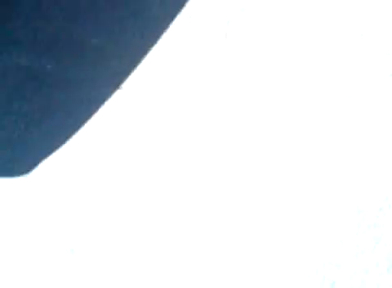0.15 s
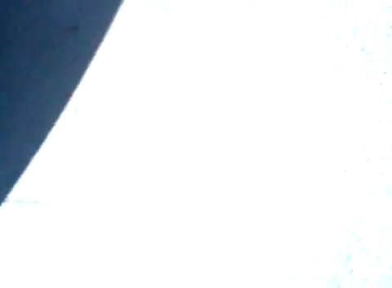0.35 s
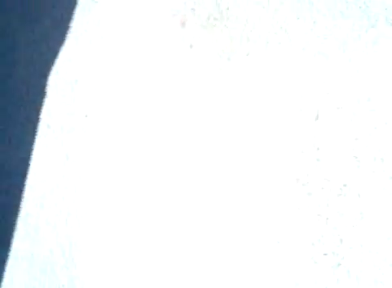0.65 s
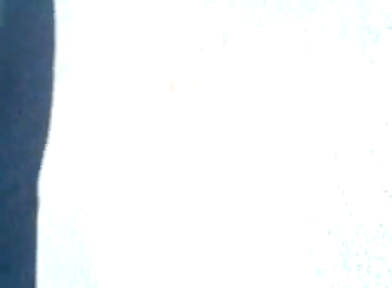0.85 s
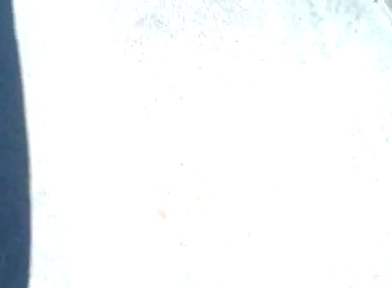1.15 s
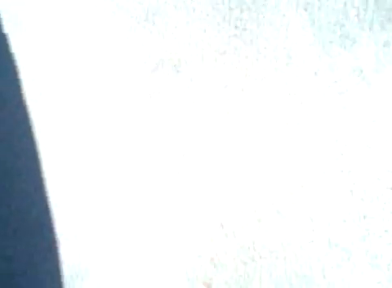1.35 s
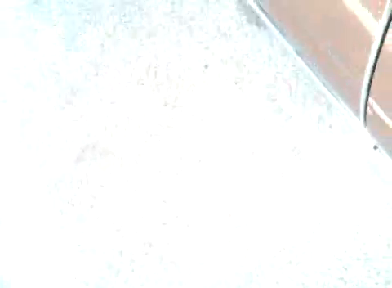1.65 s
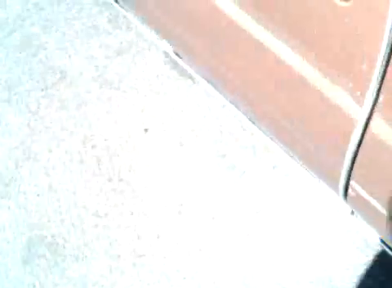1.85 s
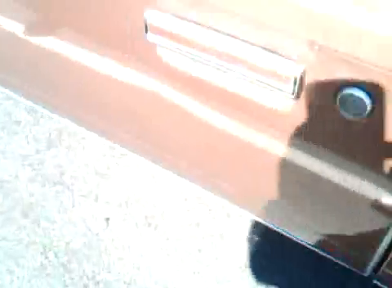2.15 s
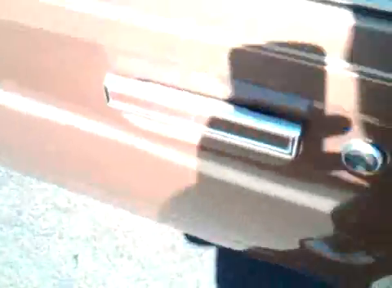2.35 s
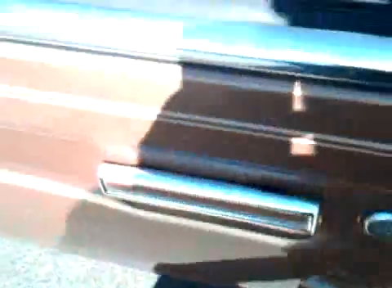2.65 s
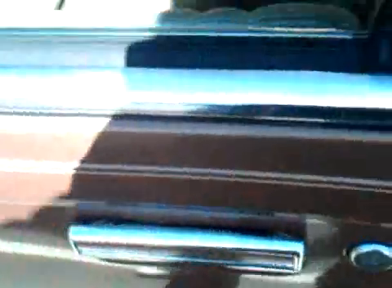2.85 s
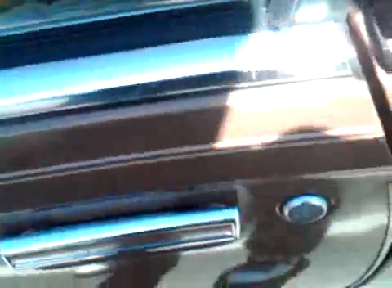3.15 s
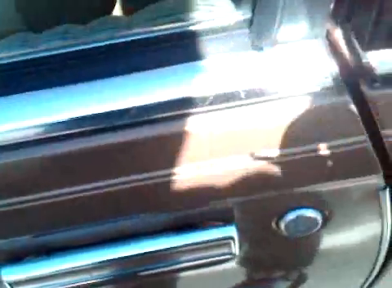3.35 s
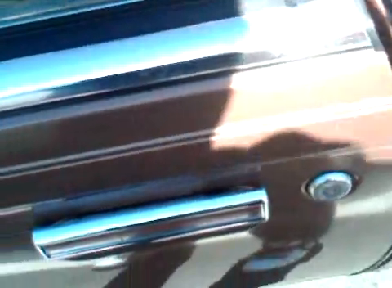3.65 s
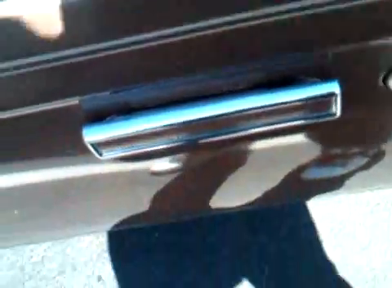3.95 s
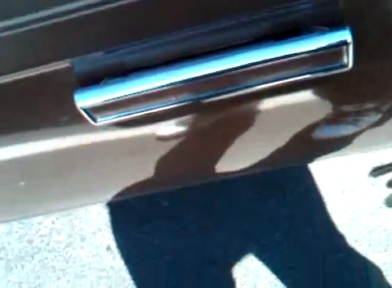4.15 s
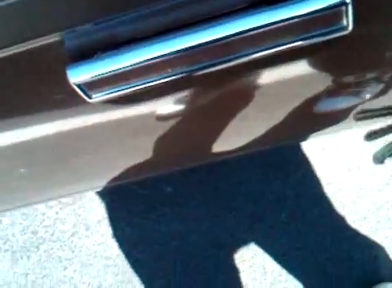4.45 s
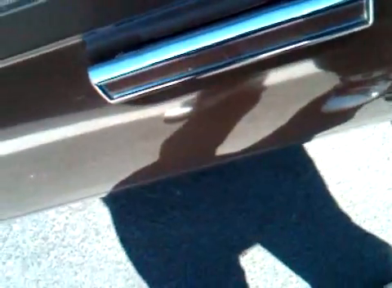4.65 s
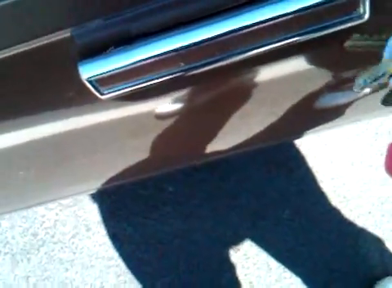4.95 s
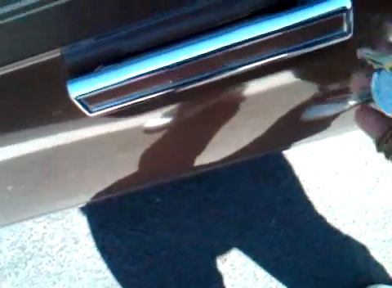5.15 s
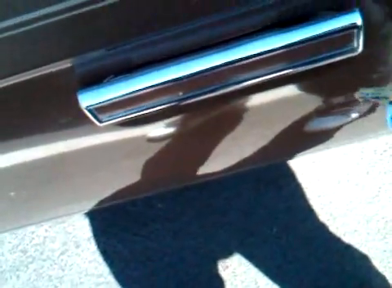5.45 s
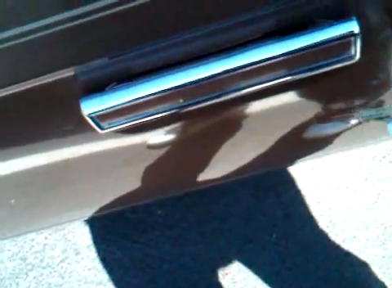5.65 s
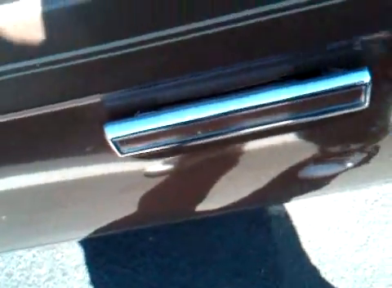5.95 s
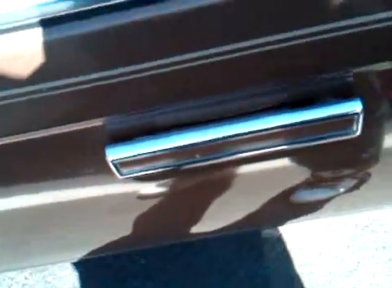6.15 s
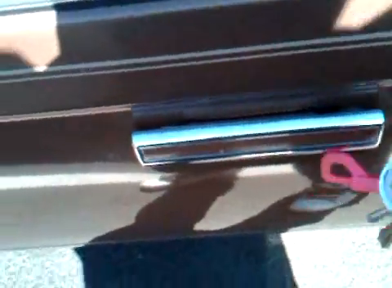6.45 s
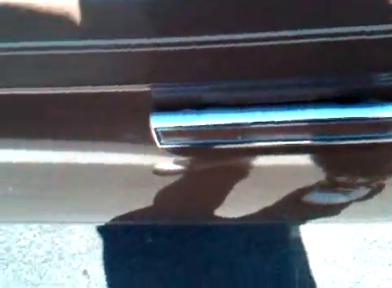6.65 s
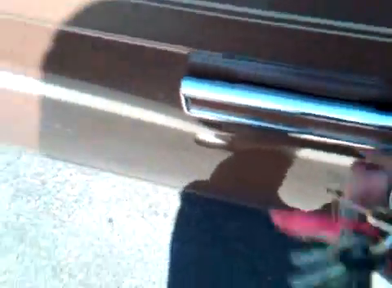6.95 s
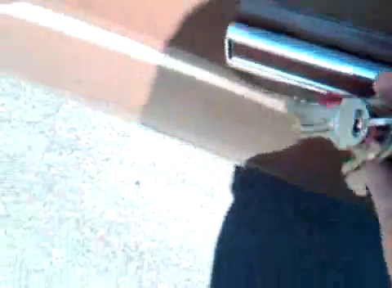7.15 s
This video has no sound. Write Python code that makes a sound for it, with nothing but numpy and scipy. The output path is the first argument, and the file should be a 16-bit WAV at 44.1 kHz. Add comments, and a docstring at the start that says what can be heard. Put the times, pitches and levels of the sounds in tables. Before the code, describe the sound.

Outdoors by a parked car, keys are handled close to the microphone over faint distant traffic: a low wavering drone near 200 Hz, soft rumble and tyre hiss. From 0 to 1 s come light, separate clinks; from 1 to 2.4 s the bunch jangles densely, with bright cracks around 1.3, 1.8 and 1.9 s. After a short thinning, a sharp clink at 2.9 s leads to a lively cluster at 3.2-3.5 s, then scattered clinks until 4.15 s. It is almost quiet from 4.2 to 5.2 s, with small lock taps near 4.3 and 5.0. A hard metallic clack with a brief rattle hits at 5.4 s; double clicks follow at 5.7 s, clinks around 6 s, a dull tap at 6.3 s. Jangling surges from 6.6 s, ending with the loudest clash and a knock at 7.25 s. Rings are short, dry and high, with treble cut off above about 7 kHz.

```python
"""A bunch of keys jangles in a hand, close to the microphone: cracks and short rings over a wash of contacts.
Beside it, a key is pushed into a parked car's door lock, turned and pulled out: blows excite resonances.
Further off, street traffic drones, growls, rumbles and hisses as bands of noise with drifting levels.
A steep band limit near 7.4 kHz, a faint image of the top band mirrored about 8 kHz and a trace of hiss end it."""
import sys
import numpy as np
from scipy import signal
from scipy.fft import rfft, irfft, next_fast_len
from scipy.io import wavfile
from scipy.ndimage import map_coordinates

SR = 44100
rng = np.random.default_rng(int(sys.argv[2]) if len(sys.argv) > 2 else 0)


def wrap_up_sound(samples):
    """Save the sound to the file named by the first command line argument, as 16-bit audio."""
    columns = np.atleast_2d(samples).T
    # keep every value between -1 and 1, then stretch to whole-number steps
    tamed = np.clip(columns, -1, 1)
    steps = np.round(tamed * 32767).astype(np.int16)
    wavfile.write(sys.argv[1], SR, steps)


N = 322371

# ringing modes of the freely hung keys: (frequency [Hz], relative level [dB], t60 when free [s])
KEY_MODES = [(2134, -3, .06), (2290, -5, .08), (2390, -2, .08), (2656, 0, .08), (3294, -2, .09),
             (3750, 1, .06), (4280, -8, .07), (4605, -5, .12), (4849, -7, .1), (4962, -5, .12),
             (5120, -6, .08), (5340, -3, .08), (5700, -5, .07), (5927, -3, .12), (6069, 0, .14),
             (6340, -3, .08), (6527, 0, .13), (6770, -2, .09), (6914, 1.5, .24), (7085, -2, .09),
             (7195, -2, .11)]
HEAVY_BELOW_HZ = 4000  # modes below belong to the heavier parts of the bunch


def amp(db):
    """Amplitude factor of a level in dB."""
    return 10 ** (np.asarray(db) / 20)


def unit(x):
    """x scaled to rms 1."""
    return x / np.sqrt(np.mean(x ** 2) + 1e-20)


def along(points, hz):
    """Values at hz, read between (Hz, value) points on a log frequency axis."""
    f, v = np.transpose(points)
    return np.interp(np.log(hz + 1), np.log(f + 1), v)


def curves(rows):
    """One value per sample for each column after the time."""
    s, *cols = np.transpose(rows)
    return [np.interp(np.arange(N) / SR, s, c) for c in cols]


def wobble(rate):
    """A smooth random curve with rate knots a second."""
    knots = rng.standard_normal(int(N * rate / SR) + 4)
    return map_coordinates(knots, [np.arange(N) * rate / SR])


def filtered(x, response):
    """x filtered by a complex response of frequency."""
    m = next_fast_len(N + SR // 2)
    return irfft(rfft(x, m) * response(np.fft.rfftfreq(m, 1 / SR)), m)[..., :N]


def colored(x, spectrum):
    """x filtered to the colour given by (Hz, dB) points, at rms 1."""
    return unit(filtered(x, lambda hz: amp(along(spectrum, hz))))


def noise(spectrum):
    """Steady noise of the given colour, at rms 1."""
    return colored(rng.standard_normal(N), spectrum)


def resonances(modes):
    """Causal response of (Hz, width Hz, dB) resonances added with alternating sign."""
    def response(f):
        total = 0
        for k, (c, w, db) in enumerate(modes):
            total = total + (-1) ** k * amp(db) * 1j * f * w / (c * c - f * f + 1j * f * w)
        return total
    return response


def street():
    """Distant traffic: a drifting band of engine drone over rumble, growl and tyre hiss."""
    # traffic before the small level wobbles: (time [s], drone pitch [Hz], drone level [dB],
    # engine growl level [dB], rumble level [dB], tyre hiss level [dB])
    traffic = [(0, 192.9, -48.5, -65.5, -57.5, -65.5), (0.5, 193.2, -49.5, -68, -59.5, -66.5),
               (1.25, 191.6, -55.5, -58.5, -56.5, -66.5), (1.75, 198.3, -52, -59.5, -61.5, -65.5),
               (2.1, 200, -59.5, -75, -58, -67.0), (2.7, 208.6, -56, -69, -58.5, -64.5),
               (3.3, 214.9, -51, -71, -61, -64), (3.7, 225.2, -51.5, -73, -68, -68.5),
               (4.2, 227.5, -47.5, -67.5, -59, -66.5), (4.45, 222.1, -51.5, -71, -58, -66.5),
               (4.7, 217.4, -52, -74, -58, -67), (5.35, 211.2, -61, -69, -60.5, -66),
               (6.0, 235.8, -56, -78, -62, -66.5), (6.6, 232.7, -55.5, -69, -55, -66),
               (7.31, 212.5, -61.5, -74.5, -62.5, -68.5)]
    # colour of the rumble: (frequency [Hz], relative density [dB])
    rumble_color = [(12, -36), (20, -9.5), (59, 5), (140, -5), (180, -26), (310, -120)]
    # colour of the tyre hiss: (frequency [Hz], relative density [dB])
    hiss_color = [(260, -38), (450, 1), (575, 1.5), (796, 7), (973, 6), (2910, -18), (4250, -23),
                  (5080, -33), (6500, -38), (8450, -44), (14300, -120)]
    growl_color = [(200, -62.0), (300, -9), (390, -3.5), (480, -10), (600, -19), (800, -45)]  # (Hz, dB)

    drone_hz, drone_db, growl_db, rumble_db, hiss_db = curves(traffic)
    # slow noise carried on the drifting pitch makes a band that follows it
    slow = filtered(rng.standard_normal((2, N)), lambda hz: 1 / (1 + (hz / 62) ** 3))
    turn = 2 * np.pi * np.cumsum(drone_hz) / SR
    drone = unit(slow[0] * np.cos(turn) + slow[1] * np.sin(turn))
    out = amp(drone_db + 1.7 * wobble(8)) * drone
    out += amp(growl_db + 1.7 * wobble(9)) * noise(growl_color)
    out += amp(rumble_db + 2.2 * wobble(4)) * noise(rumble_color)
    out += amp(hiss_db + 1.2 * wobble(7.4)) * noise(hiss_color)
    return out


def shaking():
    """Jingle level and relative scrape level in dB: shakes rise fast, hold and settle; their powers add."""
    # shakes of the bunch: (start [s], length [s], jingle level [dB],
    # scrape of the heavier parts against that [dB])
    shakes = [(0.18, 0.042, -67, -6.5), (0.623, 0.054, -62.5, -5.5), (0.695, 0.064, -56.5, -11.5),
              (0.864, 0.064, -57, -10), (0.98, 0.13, -57, -14), (1.045, 0.11, -52.5, -9),
              (1.142, 0.26, -46.5, -10.5), (1.405, 0.045, -52.5, -25), (1.662, 0.0044, -56.5, -14),
              (1.701, 0.038, -55, -11), (1.81, 0.067, -47, -16), (1.886, 0.086, -44, -12.5),
              (2.019, 0.017, -52, -16), (2.087, 0.039, -58.5, -12), (2.157, 0.0048, -40, -10),
              (2.288, 0.14, -57, -15.5), (2.567, 0.016, -56.5, -0.5), (2.787, 0.027, -56.5, -15),
              (2.892, 0.0097, -44, -17.5), (3.01, 0.0039, -53, -25), (3.068, 0.012, -54.5, -0.5),
              (3.209, 0.045, -47.5, -23), (3.28, 0.1, -46, -8), (3.439, 0.086, -47, -24),
              (3.553, 0.077, -59.5, -24), (3.695, 0.1, -54.5, -15), (3.792, 0.0077, -68.5, -19),
              (3.857, 0.0091, -53.5, -7), (3.937, 0.016, -53, -11.5), (4.04, 0.041, -59.5, -12.5),
              (4.148, 0.01, -56, -27), (4.997, 0.045, -57, -6), (5.265, 0.037, -52.5, -3),
              (5.31, 0.024, -59, 0.5), (5.374, 0.094, -56, -8), (5.695, 0.014, -54, 2),
              (5.809, 0.06, -73.5, 5.5), (5.925, 0.049, -56, -5), (5.974, .11, -56.5, -4.5),
              (6.477, 0.047, -62, -17), (6.547, 0.0088, -50.5, -18), (6.606, 0.032, -54, -15),
              (6.684, 0.035, -53.5, -8), (6.772, 0.048, -43, -4), (6.863, 0.076, -42, -14.5),
              (6.963, 0.065, -55.5, -23), (7.01, 0.035, -53.5, -36), (7.078, 0.057, -42.5, -19),
              (7.171, 0.054, -55, -39), (7.273, 0.079, -61.5, 15.5)]
    rise_db_per_s, settle_db_per_s = 1197, 504  # before a shake starts, after it ends
    rest_db, rest_scrape_db = -83.5, 1  # the bunch barely stirring in the hand

    t = np.arange(0, N / SR + .002, .001)
    s, length, db, scrape_db = np.transpose(shakes)[:, :, None]
    rising_db = rise_db_per_s * np.maximum(s - t, 0)
    settling_db = settle_db_per_s * np.maximum(t - s - length, 0)
    power = amp(db - rising_db - settling_db) ** 2
    light = amp(rest_db) ** 2 + power.sum(0)
    heavy = amp(rest_db + rest_scrape_db) ** 2 + (power * amp(scrape_db) ** 2).sum(0)
    return curves(np.transpose([t, 10 * np.log10(light), 10 * np.log10(heavy / light)]))


def freedom_db(shake_db):
    """Keys ring more freely the harder the bunch is shaken, up to a jingle level where they hang loose."""
    loose_db, freer_db_per_db = -54, 2.34
    return freer_db_per_db * np.minimum(shake_db - loose_db, 0)


def touches(rate, spread_db, life):
    """Tiny contacts, rate a second: noise bursts of scattered size that start sharply and fall 60 dB in life s."""
    sizes = (rng.random(N) < rate / SR) * amp(spread_db * rng.exponential(size=N))
    fade = amp(-60 * np.arange(SR // 10) / SR / life)
    return unit(signal.fftconvolve(sizes, fade)[:N] * rng.standard_normal(N))


def jingle():
    """The shaken bunch: a wash of small contacts, sharper ticks, and keys set ringing by their own chance taps."""
    # colour of the light contacts: (frequency [Hz], relative density [dB])
    wash_color = [(2060, -39), (3500, -30), (4400, -16), (5870, -3), (6410, -6), (7400, -6), (9620, -34.5),
                  (16300, -120)]
    # colour of the heavier parts scraping: (frequency [Hz], relative density [dB])
    scrape_color = [(1000, -52.5), (1700, -17), (1950, -16), (2300, -11), (3920, -8), (4400, -4),
                    (5720, -15), (9680, -120)]
    wash_db, tapped_db = -4, -4.5  # wash and tapped ringing against the jingle level
    taps_per_s, tapped_life = 45, .55  # taps on each mode; share of t60 left among touching neighbours

    jingle_db, scrape_db = shaking()
    light, heavy = amp(jingle_db), amp(jingle_db + scrape_db)
    contacts = touches(450, 2.7, life=.013) + .8 * touches(140, 3.5, life=.004)
    wash = colored(contacts, wash_color)
    scrape = colored(touches(900, 1.5, life=.016), scrape_color)
    ringing = np.zeros(N)
    for hz, db, t60 in KEY_MODES:
        strength = heavy if hz < HEAVY_BELOW_HZ else light
        taps = strength * (rng.random(N) < taps_per_s / SR) * rng.standard_normal(N)
        keep = amp(-60 / (tapped_life * t60 * SR))  # what is left of the swing after one sample
        turn = 2 * np.pi * hz / SR
        ringing += amp(db) * signal.lfilter([np.sin(turn)], [1, -2 * keep * np.cos(turn), keep ** 2], taps)
    out = amp(wash_db) * light * wash
    out += amp(tapped_db + freedom_db(jingle_db)) * ringing
    return out + amp(-3) * heavy * scrape


def clinks():
    """Keys strike keys: a short crack rings the modes nearest its bright region, at new strengths each time."""
    # keys striking keys: (time [s], strike level [dB], brightest region [Hz], heavier parts [dB])
    strikes = [(0.0438, -43.5, 4860, -13), (0.293, -52, 4090, 9.5), (0.3245, -39, 6690, -34),
               (0.463, -35, 6500, -36), (0.622, -41, 6130, -32), (0.7005, -38.5, 6610, -31),
               (0.7915, -43, 6840, -25), (0.87, -46, 6100, -25), (0.9518, -37.5, 5240, -33),
               (1.026, -42.5, 6930, -14), (1.0595, -33, 5260, -30), (1.1574, -41.5, 6900, -12),
               (1.19, -32.5, 5660, -39), (1.2152, -32.5, 5830, -20.5), (1.262, -26.5, 5850, -25),
               (1.2827, -53, 5730, 8), (1.373, -51, 5800, -14), (1.3886, -38.5, 6420, -35),
               (1.493, -35, 6100, -34), (1.5025, -30.5, 6080, -33), (1.5269, -41, 6400, -31),
               (1.5775, -39.5, 6200, -29), (1.695, -45, 6300, -23), (1.7868, -28, 5650, -27),
               (1.9289, -27.5, 6910, -19), (1.9383, -28.5, 6300, -16.5), (1.942, -35, 6070, -10),
               (1.9851, -35, 4440, -22), (2.0274, -34.5, 5130, -28), (2.0639, -38.5, 6600, -11),
               (2.12, -35, 5500, -29), (2.155, -33, 6290, -33), (2.2809, -39.5, 6520, -34),
               (2.3137, -33.5, 7330, -26), (2.3502, -42, 6420, -26), (2.3954, -43, 5900, -28),
               (2.6407, -44.5, 5090, -14), (2.731, -44, 6070, -32), (2.8767, -33, 6500, -52),
               (2.8939, -27.5, 6080, -33), (3.053, -45, 5260, -30), (3.2069, -43.5, 6900, -18.5),
               (3.261, -42, 5340, -13), (3.275, -33, 6920, -40), (3.2991, -37.5, 6900, -16),
               (3.313, -39.5, 6930, -12), (3.344, -31, 5260, -28), (3.357, -35.5, 6000, -21),
               (3.3816, -31, 6510, -25.5), (3.4343, -32, 4960, -26), (3.4678, -28.5, 6914, -31),
               (3.468, -34.5, 5340, -33), (3.481, -43, 6000, -21), (3.4963, -36, 6900, -27),
               (3.508, -36, 7150, -19), (3.7443, -32, 6280, -38), (3.8066, -38, 6780, -31),
               (3.837, -46.5, 6330, -26), (3.852, -36, 7140, -33), (3.9028, -39, 7150, -11),
               (3.9526, -45, 5600, -20), (4.0218, -32.5, 5820, -22), (4.0643, -35.5, 5310, -40),
               (4.0827, -42.5, 6270, -23), (4.0864, -29.5, 6400, -24.5), (4.1276, -47.5, 5940, -23),
               (4.154, -41.5, 5840, -22), (4.407, -48, 6660, -20), (4.712, -41.5, 6460, -12.5),
               (4.9418, -50.5, 6360, -3), (5.2492, -41.5, 6900, -7), (5.261, -40, 4715, -15),
               (5.27, -47, 6910, -14), (5.2885, -45, 6070, -7), (5.3442, -50, 6300, -32),
               (5.3719, -29, 4280, -4), (5.4066, -30.5, 5790, -32), (5.423, -42, 4960, -8),
               (5.589, -40, 6360, -17), (5.9032, -38, 4970, -5), (5.9547, -38.5, 6320, -19),
               (5.9939, -35, 5210, -18), (6.0345, -32, 6690, -19), (6.044, -42, 6950, -29),
               (6.057, -44.5, 6530, -25), (6.0833, -37.5, 5030, -34), (6.135, -33, 5410, -30),
               (6.547, -49, 6330, -27), (6.5898, -43, 6360, -28), (6.6493, -28, 4605, -4.5),
               (6.6512, -28, 6370, -33), (6.7648, -35, 5050, -28), (6.7795, -40, 6910, -16),
               (6.788, -42, 6910, -9), (6.8354, -41, 6260, -19), (6.8863, -28.5, 6300, -30),
               (6.942, -39.5, 5770, -28), (6.9479, -27.5, 5400, -25.5), (7.0242, -34, 6860, -43),
               (7.055, -30.5, 5300, -33), (7.109, -31.5, 5900, -23), (7.116, -34, 6280, -24),
               (7.158, -38.5, 6420, -29), (7.169, -40.5, 6920, -24), (7.2356, -23, 7350, -33),
               (7.2522, -21, 4470, -24), (7.26, -24, 7340, -28), (7.266, -31, 6580, -17.5),
               (7.2845, -44, 6350, 1)]
    ring_against_strike_db, struck_life = -3, .56  # ring level; share of t60 left among touching neighbours
    jolt_db = -26  # a hard strike frees a key as well: the shake it stands for, against its level

    out, t = np.zeros(N + SR), np.arange(SR // 9) / SR
    jingle_db = np.pad(shaking()[0], (0, SR), "edge")
    hz, level, t60 = np.transpose(KEY_MODES)[:, :, None]
    count, modes = len(strikes), len(KEY_MODES)
    draws = rng.standard_normal((count, 2, modes, 1))
    cracks = rng.standard_normal((count, 2, len(t)))
    # random walks of phase, one step every 16 samples
    steps = rng.standard_normal((count, modes, len(t) // 16 + 1))
    shivers = np.cumsum(steps, 2).repeat(16, axis=2)[..., :len(t)]
    high = signal.butter(2, [4000, 7300], "band", fs=SR, output="sos")
    low = signal.butter(2, [1900, 4000], "band", fs=SR, output="sos")
    for (s, db, bright_hz, heavy_db), (chance, detune), crack, shiver in zip(strikes, draws, cracks, shivers):
        start = round(s * SR)
        # light keys ring less the further they lie from the bright region
        light_db = -np.minimum(55 * np.abs(hz - bright_hz) / 1000, 18)
        near_db = np.where(hz < HEAVY_BELOW_HZ, heavy_db, light_db)
        shake_db = np.maximum(jingle_db[start:][:len(t)], db + jolt_db)
        ring_db = ring_against_strike_db + freedom_db(shake_db)
        # touching neighbours damp the ring and blur its pitch
        decay_db = -60 * t / (struck_life * t60)
        phase = 2 * np.pi * hz * (1 + .002 * detune) * t + .055 * shiver
        ring = amp(ring_db + level + near_db + 1.8 * chance + decay_db) * np.sin(phase)
        tick = .7 * amp(-60 * t / .008) * np.sin(2 * np.pi * bright_hz * t)  # the dead click of the contact
        snap_fade = 1.08 * amp(-60 * t / .0068) + .36 * amp(-60 * t / .06)
        snap = snap_fade * (signal.sosfilt(high, crack[0]) + amp(heavy_db) * signal.sosfilt(low, crack[1]))
        onset = 1 - np.exp(-t / .0005)
        out[start:][:len(t)] += amp(db) * (ring.sum(0) + tick + snap) * onset
    return out[:N]


def knocks():
    """A blow and its rattle excite the lock barrel, the part that was struck and, lower, the door skin."""
    # knocks in the lock and door: (time [s], blow level [dB], tone of the struck part [Hz],
    # tone against the blow [dB], door thud against the blow [dB], nominal decay, shortened for the tone [s])
    blows = [(1.2421, -59.5, 2340, 3, 18, 0.22), (2.568, -50.5, 3350, -16, -3, 0.52),
             (3.073, -49.5, 3080, -12, 1.5, 0.035), (4.321, -43, 2198, -16, -4, 0.12),
             (4.364, -60.5, 2240, 2, 15.5, 0.14), (4.984, -44, 2200, -22, -5, 0.42),
             (5.371, -25, 3896, -28, -11.5, 0.23), (5.6976, -39, 3320, -2, -4, 0.071),
             (5.71, -36.5, 3155, -13, -5, 0.11), (6.1378, -48, 1610, -3.5, 4, 0.12),
             (6.303, -41.5, 1675, 1.5, -2, 0.13), (6.649, -47, 2650, 5, -6, 0.11),
             (6.78, -58.5, 2320, 4, 12.5, 0.064), (6.808, -47, 2830, -2, 0.5, 0.05),
             (7.252, -30.5, 1678, -5.5, -7, 0.087), (7.2575, -40, 980, -4, 6.5, 0.21)]
    # resonances of the lock barrel: (frequency [Hz], width [Hz], level [dB])
    lock_modes = [(1456, 87, 1), (1666, 88, 6.5), (2960, 54, -11.5), (4040, 78, -0.5), (4450, 27, 4.5)]
    # resonances of the door skin: (frequency [Hz], width [Hz], level [dB])
    door_modes = [(386, 220, 2.5), (865, 465, 9.5)]
    push_s = .00004  # time for a blow's force to peak

    lock, door, tone = np.zeros((3, N + SR))
    t = np.arange(SR // 4) / SR
    rattles = rng.standard_normal((len(blows), len(t)))
    for (s, db, tone_hz, tone_db, thud_db, t60), rattle in zip(blows, rattles):
        start = round(s * SR)
        here = slice(start, start + len(t))
        life = max(t60, .01)
        push = t / push_s * np.exp(1 - t / push_s)
        rattle_fade = .35 * amp(-60 * t / .01) + .29 * amp(-60 * t / life)
        blow = 2.2 * push + rattle * rattle_fade * (1 - np.exp(-t / .0004))
        lock[here] += amp(db) * blow
        door[here] += amp(db + thud_db) * blow
        tone_fade = amp(db + tone_db - 60 * t / (.45 * life)) * (1 - np.exp(-t / .0015))
        tone[here] += tone_fade * np.sin(2 * np.pi * tone_hz * t)

    def barrel(hz):
        """The lock's resonances and a broad band beside them."""
        wide = amp(3.0) / (1 + (1200 / (hz + 1)) ** 4) / (1 + (hz / 4500) ** 4)
        return resonances(lock_modes)(hz) + wide

    return filtered(lock[:N], barrel) + filtered(door[:N], resonances(door_modes)) + tone[:N]


def scene():
    """Street, shaken bunch, key strikes and lock knocks together, as one channel."""
    return (street() + jingle() + clinks() + knocks())[None]


def record(dry):
    """A steep band limit near 7.4 kHz, a faint image of the top band mirrored about 8 kHz, a trace of hiss."""
    # edges of the band that the image is kept in: (low [Hz], high [Hz])
    image_band = (8550, 9020)
    top_hz, folding_hz = 7400, 16000  # band limit; folding rate, twice the mirror frequency

    kept = filtered(dry, lambda hz: 1 / (1 + (hz / top_hz) ** 90))
    # multiplying by a tone at the folding rate lays the spectrum down backwards from it
    mirrored = kept * np.cos(2 * np.pi * folding_hz * np.arange(N) / SR)
    image = filtered(mirrored, lambda hz: (hz > image_band[0]) & (hz < image_band[1]))
    return kept + amp(-20.0) * image + amp(-103) * rng.standard_normal(dry.shape)


dry = scene()
out = record(dry)
wrap_up_sound(out)
```